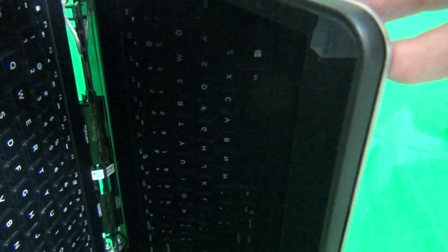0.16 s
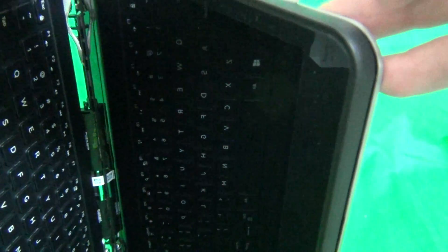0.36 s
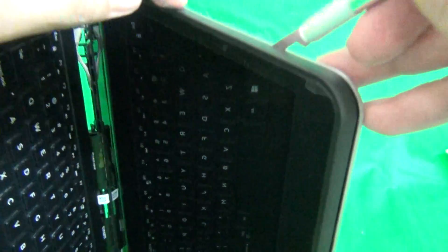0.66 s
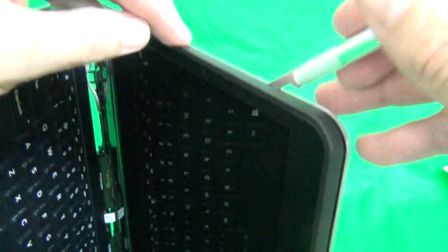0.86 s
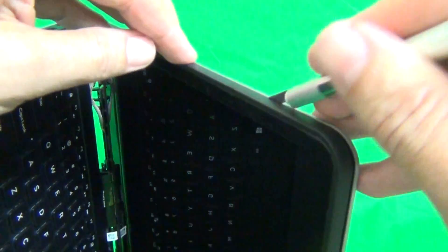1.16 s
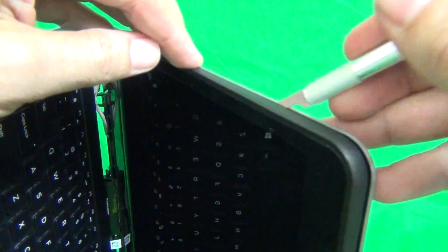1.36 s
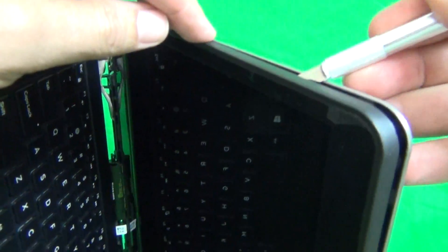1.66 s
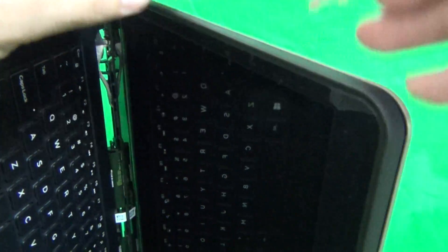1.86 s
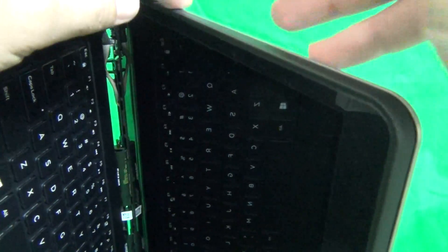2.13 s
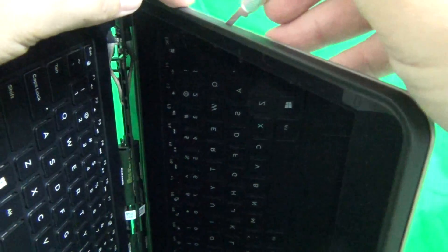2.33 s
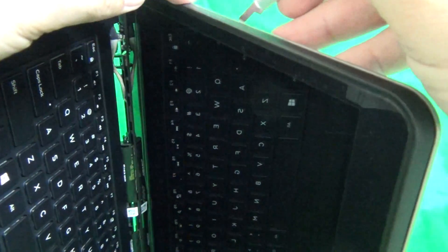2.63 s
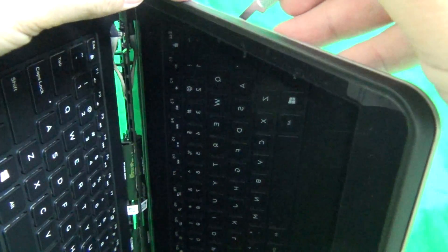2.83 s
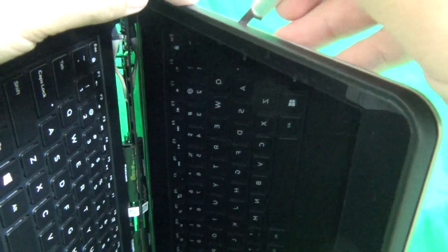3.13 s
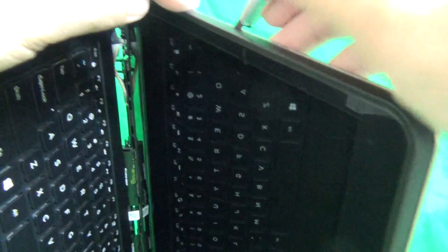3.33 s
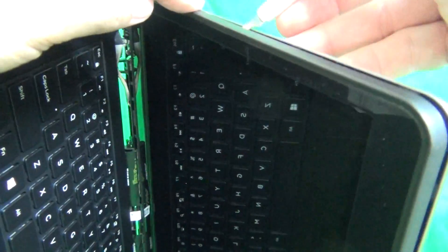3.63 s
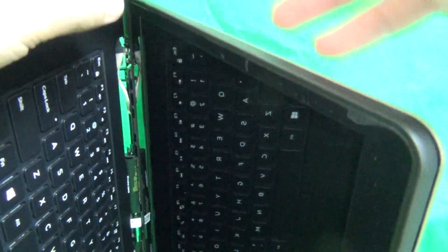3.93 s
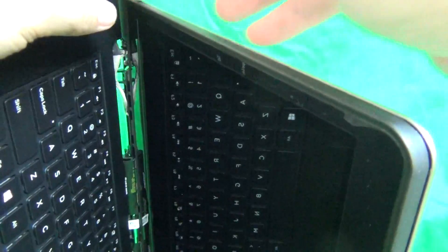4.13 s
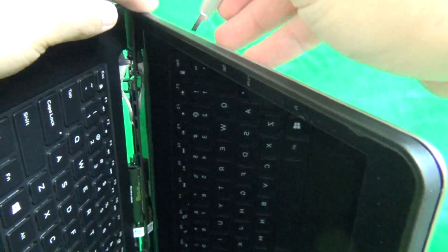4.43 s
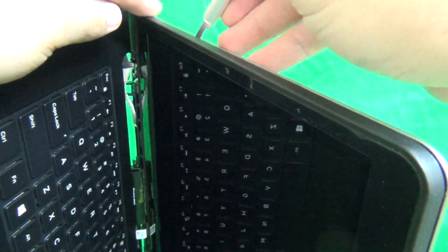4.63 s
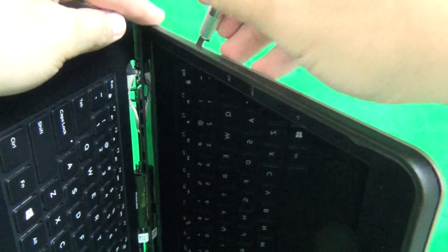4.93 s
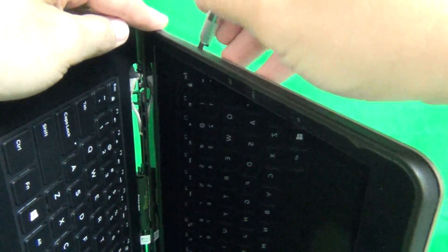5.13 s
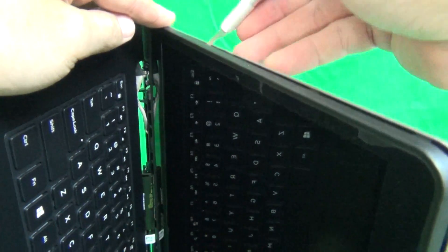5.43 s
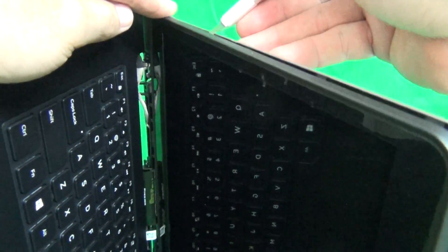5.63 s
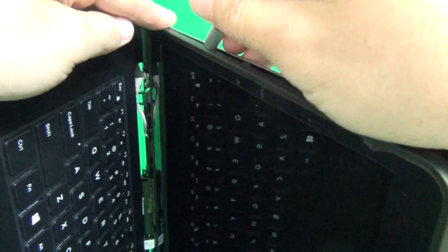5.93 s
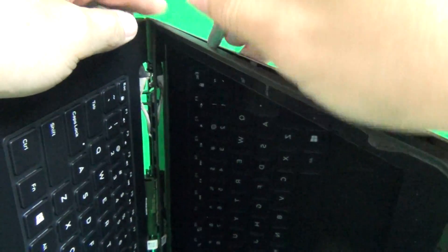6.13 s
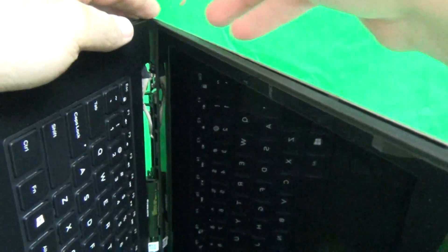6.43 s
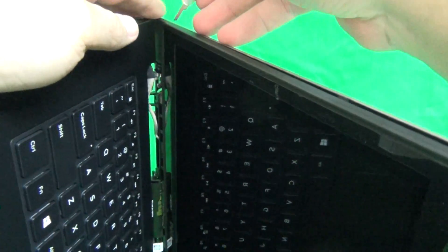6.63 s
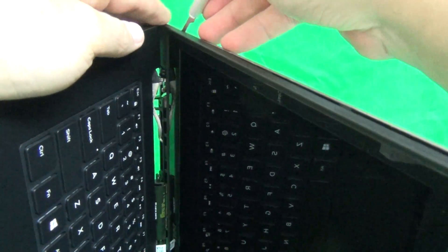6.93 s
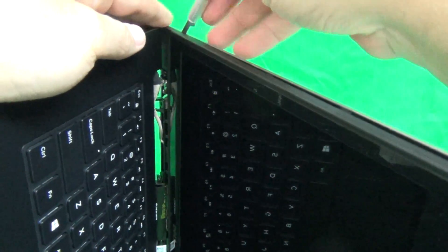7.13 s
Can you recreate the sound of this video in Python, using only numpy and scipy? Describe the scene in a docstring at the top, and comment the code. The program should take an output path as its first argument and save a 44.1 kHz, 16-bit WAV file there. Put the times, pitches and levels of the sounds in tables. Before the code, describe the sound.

Close up in a small, quiet room, a thin blade rubs along the rim of a laptop lid with fine scratches and tiny ticks. Plastic catches let go in sharp, uneven snaps, the bigger ones followed by a short hollow thump of the lid. Late on there is one faint squeak, then only light scraping. Low room noise, faint hum and a thin electronic chirr lie behind.

```python
"""Prying open a laptop lid

A thin blade pries the metal cover off the plastic frame of a laptop lid, close to two microphone ports in a small room.
Irregular slips, filtered by blade, rim and shell, make the rubbing and swells of scraping; the point taps the frame.
Catches let go in short bursts of jerks, sharp snaps that set the lid's bending modes thumping.
One faint squeak is a wavering harmonic tone. Behind lie low filtered room noise, a faint mains hum and whine,
and two narrow bands of blinking noise, an electronic chirring."""
import sys
import numpy as np
from scipy import signal
from scipy.fft import rfft, irfft
from scipy.io import wavfile
from scipy.ndimage import uniform_filter1d

SR = 44100
rng = np.random.default_rng(int(sys.argv[2]) if len(sys.argv) > 2 else 0)


def to_wav(sig):
    """Store sig (one row per channel, or 1-D mono) as 16-bit WAV at the path in sys.argv[1].

    Samples outside -1..1 are clipped; the rate is SR.
    """
    pcm = np.clip(np.atleast_2d(sig), -1, 1) * 32767
    pcm = np.round(pcm).astype(np.int16)
    wavfile.write(sys.argv[1], SR, pcm.T)  # frames by channels


N = 321048  # length in samples

# The rim rings higher the less a blow knocks the shell.
RIM_HZ, RIM_OCTAVES_PER_DB = 1920, .022


def snap(s, crack_db, snap_db, clack_db, knock_db, release):
    """A catch lets go: the fuller the blow, the lower the rim rings."""
    rim_hz = RIM_HZ * 2 ** (RIM_OCTAVES_PER_DB * (clack_db - knock_db))
    return strike((crack_db, snap_db, clack_db, knock_db), grip_hz(s), rim_hz, release)


# Bending modes of the lid. Each row: frequency in Hz, relative level in dB, t60 in seconds.
LID_MODES = [(68, -5.5, 0.18), (125.4, -1, 0.22), (141.5, -4.5, .22), (161.2, -7.5, 0.22),
             (184, -3.5, 0.22), (224.7, -4.5, 0.21), (294.3, 1.5, 0.24), (333.3, -4, 0.3),
             (354, -3.5, 0.096), (452.3, -0.5, 0.2), (523.4, -9.5, 0.26), (561, -10, 0.22),
             (662, -30, 0.26), (734, -25, 0.26), (910, -3, 0.22), (1073, -8.5, 0.22), (1130, -12, 0.32)]
# A blow stirs the modes near its favoured one most; LID_DETUNE is the largest shift, as a fraction.
FAVOUR_DB_PER_OCTAVE, LID_DETUNE = 6, 0.013


def thump(thump_db, favoured_hz, count=20000):
    """The freed cover springs and the lid's bending modes swell; the grip shifts them a little each time."""
    t = np.arange(count) / SR
    hz, db, t60 = np.transpose(LID_MODES)[:, :, None]
    spot, phase, grip = rng.uniform(-1.01, 1, (3, len(LID_MODES), 1))
    db = db + spot - FAVOUR_DB_PER_OCTAVE * abs(np.log2(hz / favoured_hz))
    decay = gain_of(db - 60 * t / t60)
    modes = decay * np.sin(2 * np.pi * hz * (1 + LID_DETUNE * grip) * t + np.pi * phase)
    swell = 1 - np.exp(-t / 0.0045)
    body = modes.sum(0) * swell
    early = round(.05 * SR)  # the level is set over the first 50 ms
    return gain_of(thump_db - 1.0) * body / np.std(body[:early])


# How long the shell rings after a blow. Each row: frequency in Hz, t60 in seconds.
SHELL_RING = [(200, 0.15), (700, 0.062), (2000, 0.033), (5000, 0.041), (9000, 0.02), (15000, 0.02)]


def strike(levels_db, hz, rim_hz, release, count=6000):
    """A catch or the blade's point strikes home in a few jerks; the shell rings briefly."""
    t = np.arange(count) / SR
    jerks = evened(slips(count, 6000, 3.47)) * np.exp(-t / release) * np.sqrt(2 / (release * SR))
    jerks *= 1 - np.exp(-t / (0.3 * release))  # the contact gives way over a moment
    blow = jerks + signal.fftconvolve(jerks, ring(SHELL_RING, count))[:count]
    drive = flattened(blow) * np.exp(-t / 0.054)
    attack = round(.008 * SR)  # levels are set over the first 8 ms
    sound = np.zeros(count)
    parts = zip(levels_db, voices(drive, hz, rim_hz, ring_db=1.5, width=820))
    for k, (db, voice) in enumerate(parts):
        # low bending waves travel more slowly, so each deeper part answers 7 samples later
        sound += gain_of(db) * np.roll(voice, 7 * k) / np.std(voice[:attack])
    return sound


def flattened(x):
    """A short blow holds all pitches about equally: partly evens out the spectrum, rms 1."""
    z = rfft(x)
    return evened(irfft(z / (abs(z) + 1e-12) ** .6, len(x)))


def voices(drive, hz, rim_hz, ring_db, width):
    """What a contact sets ringing: the blade's edge, the stiff catch, the frame's rim, the hollow shell."""
    edge = band(band(drive, 9500, 13500, order=1), 8500, 20000, order=2)
    tip = band(band(drive, 5400, 10170, order=2), 990, 10500, order=3)
    tip = tip + gain_of(ring_db) * resonate(tip, hz, width)
    rim = band(drive, rim_hz / 1.846, rim_hz * 1.687, order=2)
    rim = rim + gain_of(-6.0) * resonate(rim, rim_hz, width=2200)
    shell = band(drive, 369, 1310, order=2)
    return edge, tip, rim, shell


# The ring of blade and catch shifts as the hand changes its grip. Each row: time in seconds, ring in Hz.
GRIP = [(1.1, 7900), (3.45, 7650), (4.1, 7600), (4.5, 8640), (5.12, 8660), (5.45, 7530), (6.55, 7950),
        (6.9, 5340), (7.15, 7700)]


def grip_hz(s):
    """Where blade and catch ring at time s, gliding between the grips."""
    return np.interp(s, *np.transpose(GRIP))


# The lower the rim rings, the more the shell knocks; SCRAPE_KNOCK_DB is relative to the rasp.
SCRAPE_RIM_HZ, SCRAPE_KNOCK_DB, KNOCK_DB_PER_OCTAVE = 2270, -8, -13.5


def scrape(row, ring_count=1500):
    """A swell of scraping noise: dense slips rise and fall away, exciting the shell and faintly the lid."""
    start, swell, fade, hiss_db, rasp_db, rim_hz = row
    knock_db = rasp_db + SCRAPE_KNOCK_DB + KNOCK_DB_PER_OCTAVE * np.log2(rim_hz / SCRAPE_RIM_HZ)
    count = round((swell + fade) * SR) + ring_count
    force = np.interp(np.arange(count) / SR, [0, swell, swell + fade], [0, 1, 0]) ** 0.6
    uneven_db = 2.0 * evened(uniform_filter1d(rng.standard_normal(count), size=90))
    jerks = slips(count, 4000, 4.8) * force * gain_of(uneven_db)
    drive = 0.87 * jerks + signal.fftconvolve(jerks, ring(SHELL_RING, ring_count))[:count]

    edge, *deeper = voices(drive, grip_hz(start), rim_hz, ring_db=3.5, width=660)
    levels_db = hiss_db - 14.5, hiss_db, rasp_db, knock_db
    parts = zip(levels_db, [np.roll(edge, 60), *deeper])  # the edge sounds 60 samples later
    contact = sum(gain_of(db + 0.1) * evened(voice) for db, voice in parts)
    shake = evened(sum(gain_of(db) * resonate(drive, hz, 3.4 / t60 + 25) for hz, db, t60 in LID_MODES))
    sound = contact + gain_of(knock_db - 5.5) * shake
    return start, sound * np.sqrt(np.mean(force ** 2)) * signal.windows.tukey(count, .1)


# Blade and fingers sliding lightly all along.
# Each row: time in seconds, hiss in dB and rasp in dB, both before the trims below.
RUB = [(0.0, -66, -62.5), (0.4, -61.5, -62), (0.73, -56.5, -56), (1.34, -62, -58), (1.58, -57.5, -55.5),
       (2.33, -65.5, -61.5), (3.2, -62, -59.5), (3.47, -56.5, -58), (3.65, -56.5, -57), (4.03, -55, -56),
       (4.3, -62, -61.5), (4.83, -70, -63), (4.97, -60, -58), (5.66, -61.5, -60.5), (6.35, -57, -59),
       (6.79, -65, -62.5), (6.97, -61, -50.5), (7.28, -64, -64)]
RUB_HISS_DB, RUB_RASP_DB = -1, -2.0


def rub():
    """Light sliding: the blade, catch and rim resonances under a fine, uneven grain."""
    s, hiss_db, rasp_db = np.transpose(RUB)
    t = np.arange(N) / SR
    grip_db = 1.5 * evened(uniform_filter1d(rng.standard_normal(N), size=500))
    grain = slips(N, 9000, 2.1) * gain_of(grip_db)
    edge, tip, rim, _ = voices(grain, 7140, 2190, ring_db=16.0, width=2600)
    hiss = evened(tip) + gain_of(-13.0) * evened(edge)
    hiss_gain = gain_of(np.interp(t, s, hiss_db) + RUB_HISS_DB)
    rasp_gain = gain_of(np.interp(t, s, rasp_db) + RUB_RASP_DB)
    return hiss_gain * hiss + rasp_gain * evened(rim)


TICK_RELEASE_S, TICK_RIM_HZ = 0.0017, 2820
TICK_CRACK_DB, TICK_KNOCK_DB = -15, -16  # relative to the point


def tick(s, point_db, rim_db):
    """The blade's point taps the frame, too lightly to move the lid."""
    levels_db = point_db + TICK_CRACK_DB, point_db, rim_db, point_db + TICK_KNOCK_DB
    return strike(levels_db, grip_hz(s), TICK_RIM_HZ, TICK_RELEASE_S)


SQUEAK_AT_S, SQUEAK_LENGTH_S, SQUEAK_HZ, SQUEAK_DB = 6.95, .15, 974, -53
SQUEAK_WAVER, SQUEAK_DB_PER_HARMONIC = 0.017, -7  # waver: rms fraction of the pitch


def squeak():
    """A finger drags, sticking and slipping evenly for a moment: a thin, wavering tone."""
    count = round(SQUEAK_LENGTH_S * SR)
    waver = evened(uniform_filter1d(rng.standard_normal(count), size=400))
    turns = np.cumsum(SQUEAK_HZ * (1 + SQUEAK_WAVER * waver)) / SR
    tone = sum(gain_of(SQUEAK_DB_PER_HARMONIC * k) * np.sin(2 * np.pi * k * turns) for k in range(1, 4))
    return gain_of(SQUEAK_DB) * evened(tone) * signal.windows.tukey(count, .8)


# Near reflections that differ between the ports. Each row: frequency in Hz, side level in dB.
NEAR_SIDE = [(100, -30), (500, -24), (1200, -23), (2500, -24), (4000, -35.5), (5500, -16.5), (7500, -13),
             (10000, -12.5), (13000, -24)]


def ports(x, count=900):
    """Close sound reaches both ports alike, except for reflections off keyboard, hands and table."""
    side = colour(signal.oaconvolve(x, ring(SHELL_RING, count))[:N], NEAR_SIDE)
    return np.array([x + side, x - side])


# Reverberation of the room. Each row: frequency in Hz, t60 in seconds.
ROOM_RING = [(100, 0.63), (300, 0.49), (800, 0.25), (2000, 0.15), (5000, 0.13), (9000, 0.14), (15000, 0.1)]
# How strongly the room is stirred. Each row: frequency in Hz, send level in dB.
ROOM_SEND = [(100, -8.5), (400, -13), (1000, -10.5), (2500, -12.5), (6000, -14.5), (14000, -21)]
# How unlike the room sounds at the two ports. Each row: frequency in Hz, side level in dB.
ROOM_SIDE = [(100, -24), (400, -19), (1000, -34), (3000, -50), (9000, -8), (14000, -22)]


def room(x):
    """The walls' answer builds up over a few milliseconds, partly differently at each port."""
    stirred = colour(x, ROOM_SEND)
    fade_in = 1 - np.exp(-np.arange(SR // 2) / SR / 0.0067)
    common, apart = (signal.oaconvolve(stirred, ring(ROOM_RING, SR // 2) * fade_in)[:N] for _ in range(2))
    side = colour(apart, ROOM_SIDE)
    return np.array([common + side, common - side])


# Spectrum of the room noise. Each row: frequency in Hz, relative density in dB per Hz.
AIR = [(15, -22), (25, -32), (76, -2.5), (179, -4), (299, -3), (473, -8), (905, -9), (981, -7.5),
       (1090, -12), (2660, -23.5), (3050, -18.5), (3990, -21.5), (4690, -21), (5370, -22), (15800, -28.5)]
AIR_DB = -54.62  # rms of the room noise
# Left-right likeness of the room noise. Each row: frequency in Hz, likeness from 0 to 1.
SAME = [(40, 1), (150, 0.96), (500, 0.89), (3000, 0.94), (5000, 1), (7000, 0), (10000, 0.94), (14000, 1)]
# Steady electrical hum and whine. Each row: frequency in Hz, rms level in dB.
HUM = [(60, -63), (91.5, -70), (121, -67), (291, -65.5), (15735, -75)]


def background():
    """Steady room noise, partly shared by the ports, with faint electrical tones."""
    hz, t = np.fft.rfftfreq(N, 1 / SR), np.arange(N) / SR
    a, b = rfft(rng.standard_normal((2, N)))
    same = np.clip(read(SAME, hz), -1, 1)
    pair = np.array([a, same * a + np.sqrt(1 - same ** 2) * b])
    air = evened(irfft(pair * gain_of(read(AIR, hz)), N))
    hum = sum(gain_of(db) * np.sqrt(2) * np.sin(2 * np.pi * (f * t + rng.random())) for f, db in HUM)
    return gain_of(AIR_DB) * air + hum


# A faint electronic chirring in the background. Each row: frequency in Hz, width in Hz, rms level in dB.
CHIRR = [(3090, 570, -68.5), (4810, 190, -76)]


def chirr():
    """Two narrow bands of noise blink thirty times a second."""
    blink = np.cos(np.pi * 30 * np.arange(N) / SR) ** 6
    sound = np.zeros(N)
    for hz, width, db in CHIRR:
        whistle = resonate(resonate(rng.standard_normal(N), hz, width), hz, width)
        sound += gain_of(db) * evened(whistle * blink)
    return sound


def slips(count, per_s, spread_db):
    """Stick-slip: a random train of tiny jerks of unequal size."""
    size = gain_of(spread_db * np.minimum(rng.exponential(1, count), 3))
    return size * rng.choice([-1., 1.], count) * (rng.random(count) < per_s / SR)


def ring(t60s, count):
    """Response of countless overlapping modes, each band dying at its own speed; energy 1."""
    hz, t, z = signal.stft(rng.choice([-1., 1.], count), SR, nperseg=128)
    decay = gain_of(-60 * t / read(t60s, hz)[:, None])
    tail = signal.istft(z * decay, SR, nperseg=128)[1][:count]
    return tail / np.linalg.norm(tail)


def resonate(x, hz, width):
    """One resonance of gain 1, its width in Hz."""
    return signal.lfilter(*signal.iirpeak(hz, hz / width, fs=SR), x)


def band(x, lo_hz, hi_hz, order=2):
    """Causal band-pass."""
    return signal.sosfilt(signal.butter(order, [lo_hz, min(hi_hz, .49 * SR)], "band", fs=SR, output="sos"), x)


def colour(x, points, size=4096):
    """Causal minimum-phase filter that follows a table of frequency in Hz and gain in dB."""
    log_gain = np.log(gain_of(read(points, abs(np.fft.fftfreq(size, 1 / SR)))))
    taps = np.fft.ifft(np.exp(np.conj(signal.hilbert(log_gain)))).real[:size // 2]
    return signal.oaconvolve(x, taps)[:len(x)]


def read(points, hz):
    """Reads a table on a log-frequency axis."""
    f, value = np.transpose(points)
    return np.interp(np.log(hz + 1), np.log(f + 1), value)


def gain_of(db):
    """Turns dB into an amplitude factor."""
    return 10 ** (np.asarray(db) / 20)


def evened(x):
    """Scales to rms 1."""
    return x / np.sqrt(np.mean(x ** 2) + 1e-20)


def add(mix, s, sound):
    """Mixes a sound in at time s."""
    part = mix[max(round(s * SR), 0):][:len(sound)]
    part += sound[:len(part)]


# Catches letting go. Each row: start in seconds, then relative levels in dB of the crack, the snap of the catch,
# the clack of the rim, the knock of the shell and the thump of the lid; favoured lid mode in Hz,
# release (decay constant of the jerks) in seconds.
SNAPS = [(1.107, -54, -38, -31, -45, -42, 155, 0.0015), (1.4172, -49, -20.5, -24, -30.5, -35, 297, .0064),
         (1.457, -54, -31.5, -29.5, -33.5, -37, 310, 0.0023),
         (1.4735, -37, -19.5, -25.5, -50, -43, 290, 0.0025),
         (1.4851, -51, -24.5, -26, -36.5, -42.5, 330, 0.0032),
         (1.7945, -40, -21, -26, -43, -64, 100, 0.0033), (1.818, -49, -42, -30.5, -49, -61, 300, .0009),
         (1.8384, -53, -30, -37, -46, -48, 298, .0011), (3.2485, -41, -24, -25.5, -28, -40, 160, 0.0019),
         (3.2569, -56, -26, -31.5, -29.5, -44, 550, 0.0021),
         (3.381, -66, -42, -34, -33.5, -57, 400, 0.0026),
         (3.4264, -50, -22.5, -22, -25.5, -35.5, 300, 0.0019),
         (3.834, -63, -47, -39.5, -51, -51, 300, .002),
         (3.868, -44, -20.5, -26.5, -35.5, -40.5, 890, 0.0041),
         (4.5, -66, -36, -45, -48.5, -62, 450, 0.0068), (4.6154, -56, -27.5, -39, -47, -57, 298, 0.0027),
         (5.125, -50, -19, -26, -31.5, -34.5, 147, 0.0042),
         (5.7822, -41, -28, -40, -49, -55.5, 300, 0.00089),
         (5.9123, -32.5, -18, -21, -28.5, -31, 177, 0.0049),
         (6.2784, -43, -31.5, -37, -39, -44, 217, 0.001)]
# The blade's point taps the frame. Each row: start in seconds, point and rim levels in relative dB.
TICKS = [(0.3696, -54, -72), (0.696, -46, -66), (1.386, -44, -59), (1.6732, -45.5, -50.5),
         (2.282, -46.5, -56), (2.6354, -46.5, -50), (2.6518, -45, -52), (2.845, -51, -54),
         (2.862, -43.5, -47.5), (2.875, -48, -51), (2.9534, -45, -50), (3.339, -49, -60),
         (3.3684, -46, -63), (4.8218, -40.5, -54), (4.949, -41.5, -57), (5.0283, -48.5, -60),
         (5.8123, -47, -51), (6.0685, -52, -50), (6.139, -49, -48), (6.5753, -39, -51.5),
         (6.8431, -48, -48)]
# Swells of scraping noise; a few low, hollow ones lie close around a snap.
# Each row: start in seconds, swell in seconds, fade in seconds, hiss and rasp in relative dB, ring of the rim in Hz.
SCRAPES = [(0, 0.066, 0.033, -46.5, -49.5, 2660), (0.517, 0.04, 0.027, -44, -44.5, 2330),
           (.571, 0.0028, 0.019, -32.5, -34.5, 2480), (.852, 0.011, .081, -48, -49, 2470),
           (1.001, 0.042, .012, -42.5, -43.5, 2440), (1.081, .018, 0.021, -31, -33, 2430),
           (1.425, 0.032, 0.009, -32.5, -31, 1750), (1.49, 0.0091, 0.057, -41, -40.5, 2260),
           (1.72, .052, .02, -49, -50.5, 1950), (1.799, 0.02, 0.03, -26, -32, 2740),
           (2.151, .07, 0.04, -58, -55, 3900), (2.407, .016, .015, -49.5, -43.5, 2250),
           (2.568, 0.019, 0.029, -29, -34, 3780), (2.749, 0.02, 0.03, -44.5, -42, 3420),
           (2.908, .021, 0.0058, -27.5, -30.5, 2840), (3.121, 0.0067, 0.024, -43, -46, 2850),
           (3.233, 0.019, 0.0035, -45, -39, 3000), (3.481, 0.0068, 0.041, -42, -49, 2600),
           (3.564, 0.018, 0.068, -35.5, -39, 2270), (3.805, 0.048, 0.014, -44, -46, 1800),
           (3.872, 0.0047, 0.037, -35.5, -38, 2480), (3.91, 0.11, 0.18, -58, -53, 2440),
           (4.13, 0.045, .03, -53, -60, 2400), (4.775, 0.026, 0.096, -44, -50.5, 2100),
           (5.058, .02, 0.036, -36.5, -42.5, 2550), (5.138, 0.0062, 0.073, -44, -46, 1900),
           (5.33, 0.068, 0.066, -49, -56, 2090), (5.443, 0.067, 0.018, -35, -38.5, 1750),
           (5.717, 0.026, 0.0087, -41.5, -47, 1780), (5.897, 0.012, .012, -46, -38.5, 1670),
           (6.248, 0.027, .0049, -45.5, -47, 2200), (6.71, 0.052, .05, -56, -56.5, 2600),
           (6.895, .0084, .021, -30.5, -30, 3100), (6.93, 0.041, 0.15, -57, -51.5, 2870),
           (7.069, 0.047, .05, -51.5, -50.5, 2120), (7.154, 0.0091, .015, -44.5, -49.5, 2000)]
# Tone of the shell as the close microphone hears it. Each row: frequency in Hz, gain in dB.
TONE = [(60, 4.5), (300, 7.5), (600, 2), (1000, 4), (1600, 0.5), (2600, -2), (3800, -1.5), (4800, 5),
        (6000, 1.5), (7800, -0.5), (9500, 0), (11500, -1.5), (14000, -1.5), (16000, 0)]


def scene():
    """Snaps, ticks, scrapes and rubbing sound through the shell, in a small, quietly humming room."""
    contacts, lid = np.zeros(N), np.zeros(N)
    for s, *levels_db, thump_db, favoured_hz, release in SNAPS:
        add(contacts, s, snap(s, *levels_db, release))
        add(lid, s, thump(thump_db, favoured_hz))
    for s, point_db, rim_db in TICKS:
        add(contacts, s, tick(s, point_db, rim_db))
    for row in SCRAPES:
        add(contacts, *scrape(row))
    add(lid, SQUEAK_AT_S, squeak())
    near = colour(contacts + rub(), TONE) + lid
    return ports(near) + room(near) + background() + chirr()


# The left port hears less bass. Each row: frequency in Hz, left minus right in dB.
BALANCE = [(60, -8), (130, -10), (220, -4.5), (500, 0.5), (1000, -1.1), (2000, 0), (5000, -0.5), (12000, 0)]
EDGE_HZ = 15950  # upper band limit


def record(dry):
    """Two ports of unequal bass, their gains averaging 1, then the band limit."""
    lean = gain_of(read(BALANCE, np.fft.rfftfreq(N, 1 / SR)))
    port_gains = np.array([2 * lean, 2 * np.ones_like(lean)]) / (1 + lean)
    heard = irfft(rfft(dry) * port_gains, N)
    edge = signal.firwin(255, EDGE_HZ, window=("kaiser", 8), fs=SR)
    return signal.oaconvolve(heard, edge[None], "same")


dry = scene()
out = record(dry)
to_wav(out)
```